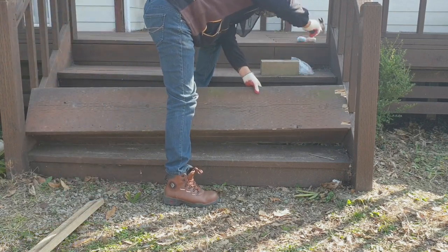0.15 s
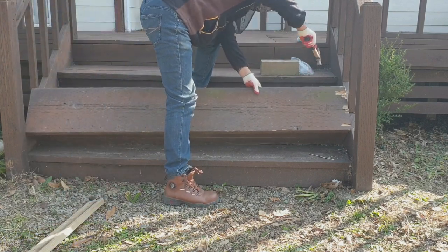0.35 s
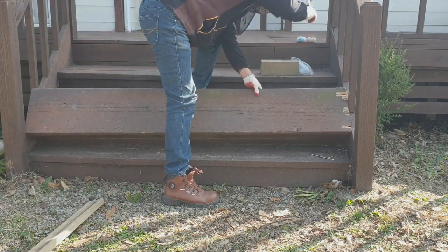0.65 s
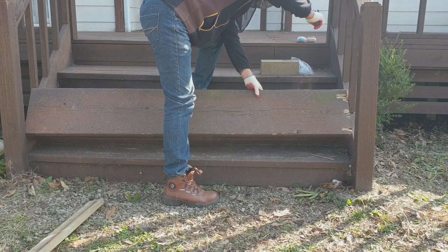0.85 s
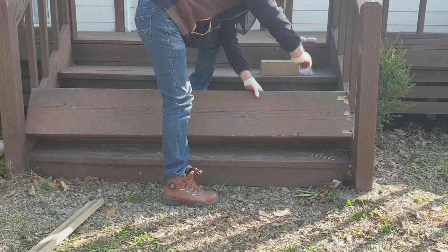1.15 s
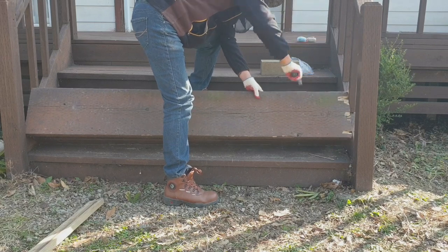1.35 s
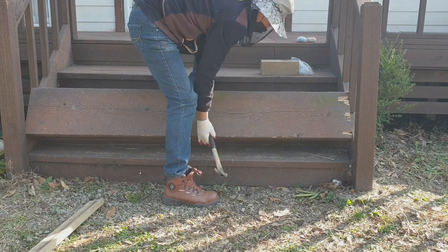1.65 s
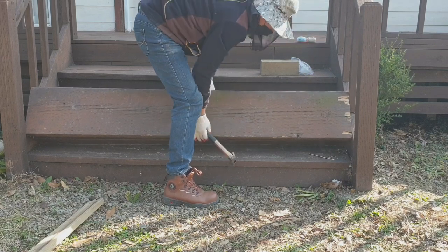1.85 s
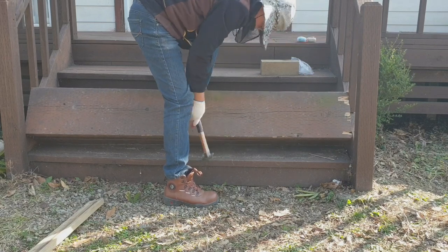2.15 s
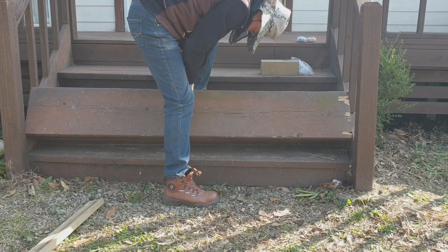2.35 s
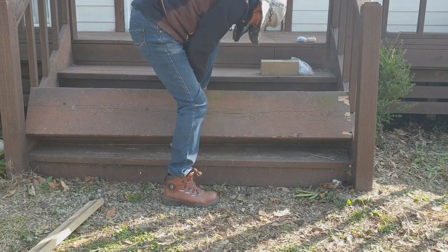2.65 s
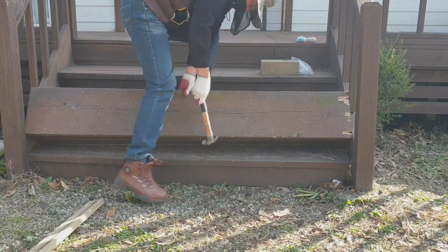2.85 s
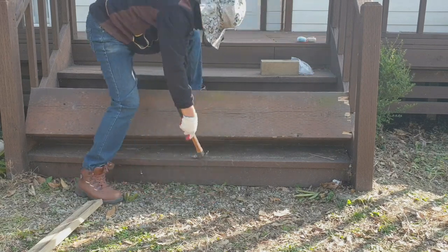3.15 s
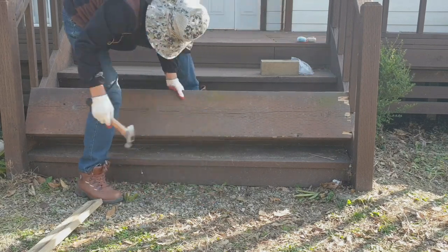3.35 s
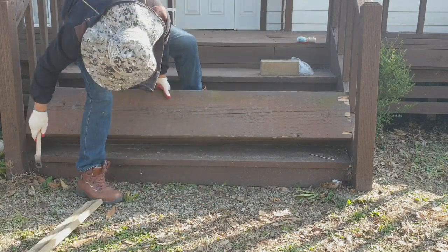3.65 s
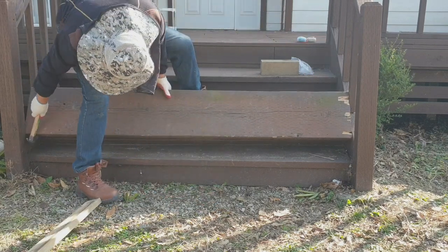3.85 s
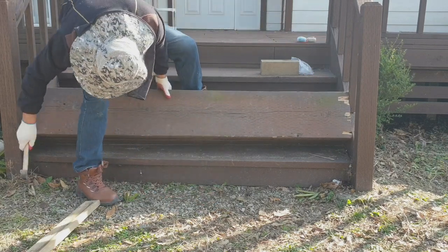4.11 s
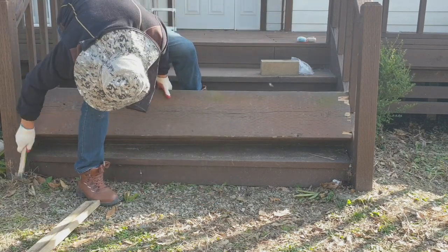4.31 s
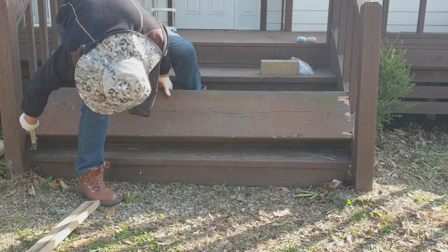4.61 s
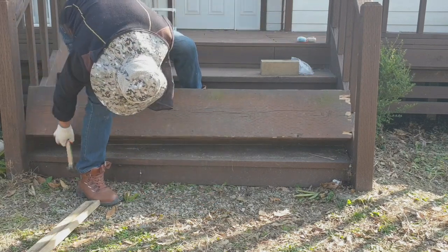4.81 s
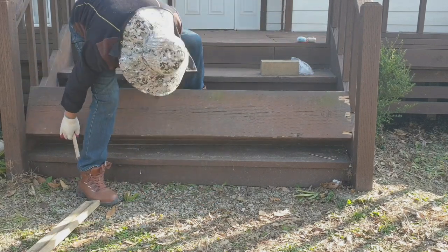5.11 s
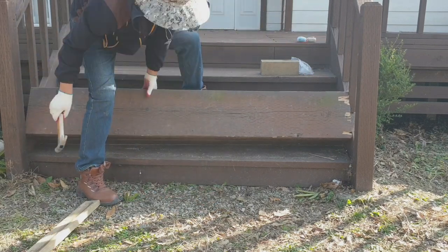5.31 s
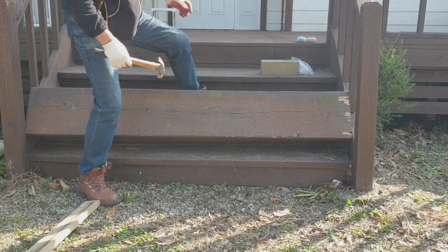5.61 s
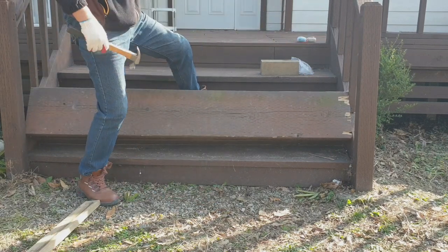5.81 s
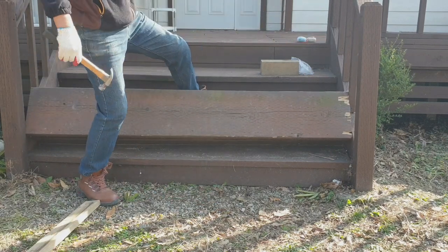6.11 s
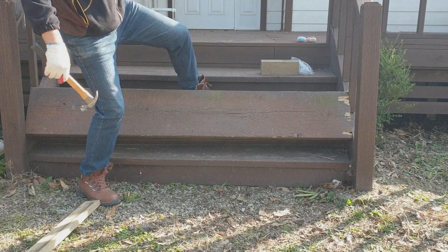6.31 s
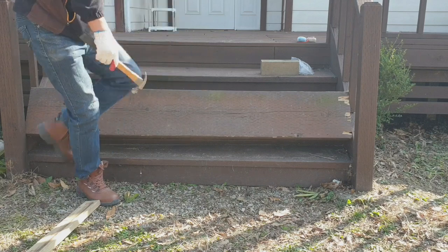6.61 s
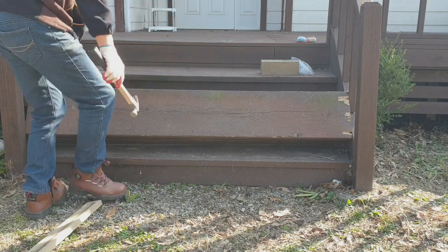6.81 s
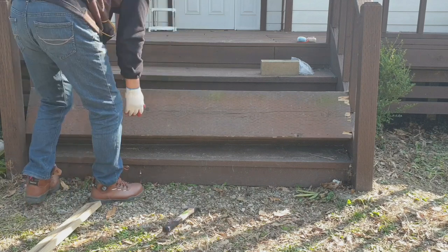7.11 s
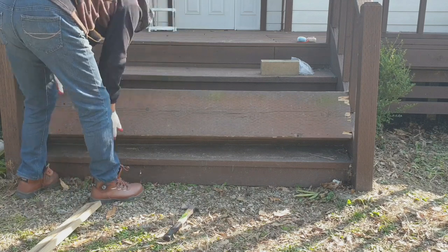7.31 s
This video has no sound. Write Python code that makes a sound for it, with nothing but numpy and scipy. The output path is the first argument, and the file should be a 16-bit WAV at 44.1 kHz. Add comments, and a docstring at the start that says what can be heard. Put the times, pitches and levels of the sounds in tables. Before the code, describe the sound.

Outdoors in a yard, a hammer strikes a loose wooden stair tread about four times a second, hard woody knocks with a slight rattle. The blows stop while boots shift with dull bumps and gritty scuffs, then a few scattered knocks come mostly from the left. Finally only steps on gravel and dry leaves remain. Close stereo microphone, soft wind rumble and faint hiss.

```python
"""Hammer knocks on a loose tread of an outdoor wooden stair: first at its right end, later mostly at its left.
A knock is filtered noise in four bands with a rebound, over sine modes of the stair and a short tail of the yard.
Between the blows boots bump boards and ground and stones click under them, made in the same way without rebound;
soles also press gravel and dry leaves in noisy snaps.
Low puffs of wind rumble on the stereo microphone over a faint hiss; both are filtered noise."""
import sys
import numpy as np
from scipy import signal
from scipy.fft import rfft, irfft
from scipy.io import wavfile
from scipy.ndimage import uniform_filter1d

SR = 44100
rng = np.random.default_rng(int(sys.argv[2]) if len(sys.argv) > 2 else 0)


def store_wav(level_fs):
    """Save 16-bit WAV to argv[1]."""
    pcm = np.round(np.clip(np.atleast_2d(level_fs), -1, 1) * 32767)
    wavfile.write(sys.argv[1], SR, pcm.T.astype(np.int16))


N = 328986  # samples in the scene
CONTACT_SIZE = 16384  # samples in one knock or bump with its tail


def hammer(ring_db=-3.0):
    """Steel on wood: each blow is a clatter with one rebound, over the ring of the boards."""
    # hammer blows: (t/s, side - left + right, swell time/s, rebound after/s, rebound level/dB, force/dB,
    #   brightness/dB per step, then f/Hz and level/dB of the low, middle and high pitch that the place drives)
    blows = [ (0.095, 0.34, 0.0066, 0.013, -9, -25.5, 0, 239, -20.5, 584, -23.5, 850, -10),
             (0.311, 0.96, 0.0045, 0.016, 5, -27, -0.3, 196, -12, 306, -25, 626, -29.5),
             (0.553, 0.57, 0.0071, .014, 4.5, -28.5, 1, 118, -19.5, 208, -20, 608, -22.5),
             (0.795, .6, .007, 0.014, 0.5, -24, -1, 208, -16, 277.6, -8.5, 800, -27.5),
             (1.044, 0.58, .0078, .015, -8.5, -22.5, -0.5, 197.9, -13.5, 269.5, -12.5, 830, -14),
             (1.259, 0.97, .004, .01, -11, -27.5, 1.5, 210.1, -14.5, 313.4, -15.5, 1010, -22),
             (1.452, 0.48, 0.006, 0.016, -2, -37, -4, 192.4, -15.5, 285.5, -23.5, 430, -44),
             (3.002, -0.87, .0035, 0.011, -20, -35, -3.5, 134, -19.5, 198, -18, 466, -16.5),
             (3.812, -.75, .007, .016, -3.5, -28, -5, 190.5, -9.5, 322.5, -14, 470, -21.5),
             (4.263, .7, 0.0046, .02, -12, -24.5, -3.5, 171.2, -23, 344.5, -12, 1302, -20),
             (4.447, -0.83, .0066, 0.02, -3.5, -24, -3.5, 222.2, -11, 286.7, -10.5, 643, -14),
             (4.635, -.8, .0059, 0.013, -6, -27.3, -2.2, 246.9, -10, 278.4, -7.5, 530, -29.5)]
    # steel on wood in the bands thud, knock, crack, tick: (level at force 0/dB, steps of brightness)
    steel = [(1, -0.8), (0.15, -1.1), (0.69, 0.39), (-2, 1.5)]
    tail_db, tail_swell_s = 5.5, 0.009  # the yard's answer to a blow of this swell time without rebound

    out = np.zeros((2, N))
    left_end, right_end = grain_of_wood(-1), grain_of_wood(1)
    for s, side, time, rebound, rebound_db, force_db, bright_db, *driven in blows:
        levels = [force_db + db + steps * bright_db for db, steps in steel]
        bounce = amp(rebound_db)
        # longer contacts and stronger rebounds feed the yard more
        fed = time / tail_swell_s * (1 + 0.35 * bounce ** 2)
        wet_db = tail_db + 10 * np.log10(fed)
        colour = right_end if side > 0 else left_end
        knock = clatter(colour, side, time, levels, rebound, bounce, wet_db)
        ring = boards(side, time, zip(driven[::2], driven[1::2]))
        add(out, s, knock + amp(ring_db) * ring)
    return out


def clatter(colour, side, time, levels, rebound=0, bounce=0, wet_db=0,
            rattle_db=2.5, rattle_s=0.0013, echo_db=3.0, echo_s=0.009):
    """The crowd of short modes that one contact wakes, band by band as noise, and its tail in the yard."""
    # dense modes and yard tail in the bands thud, knock, crack, tick: (low f/Hz, high f/Hz, delay/s,
    #   swell time factor, rebound factor, tail level/dB, tail t60/s, left-right likeness)
    bands = [(106, 340, 0.00047, 1.2, 0.98, -11.5, 0.23, 0.98),
             (403.3, 1000, 0.0026, 1., 0.14, -10.5, 0.19, 0.82),
             (1106, 5450, 0.00037, .8, .6, -15.5, 0.21, 0.47),
             (4000, 13000, 0.00027, 0.52, 1., -16.5, 0.17, 0.42)]

    t, hz = np.arange(CONTACT_SIZE) / SR, freqs(CONTACT_SIZE)
    rattle = amp(rattle_db * wobble(CONTACT_SIZE, rattle_s * SR))  # the direct sound chatters
    echoes = amp(wet_db + echo_db * wobble(CONTACT_SIZE, echo_s * SR))  # rails and wall answer in clumps
    # a contact with little tick also has a duller crack
    dull = np.clip(amp(0.52 * (levels[3] - levels[2] + 6.0)), 0.55, 1)
    out = np.zeros((2, CONTACT_SIZE))
    for db, top, row in zip(levels, [1, 1, dull, 1], bands):
        lo, hi, delay, slow, share, tail_db, t60, likeness = row
        low_cut = 1 + (lo / (hz + 1)) ** 12
        high_cut = 1 + (hz / (hi * top)) ** 12
        band = colour / np.sqrt(low_cut * high_cut)

        first = swell(t - delay, time * slow)
        second = bounce * share * swell(t - rebound, 0.71 * time * slow)  # the loose board slaps back once
        shape = np.hypot(first, second)
        direct = unit(pair(band, likeness, CONTACT_SIZE, side) * shape * rattle)

        build_up = 1 - np.exp(-(t / 0.0078) ** 2)
        tail = pair(band, likeness ** 4, CONTACT_SIZE) * amp(tail_db - 60 * t / t60) * build_up
        tail /= np.hypot(1, (t / 0.42) ** 3)  # the tail fades faster as it goes on
        out += amp(db) * (direct * np.sqrt(np.mean(shape ** 2)) + tail * echoes)
    return out


def boards(side, time, driven, falloff_db=80, free=0.99, lag_s=0.00015, hold=1.03):
    """Modes of the stair as sines: they swell with the contact and ring on, strongest near the driven pitches."""
    # modes of the stair: (f/Hz, t60/s)
    modes = [(120, 0.038), (144, 0.16), (175, 0.17), (199, 0.14), (218, 0.14), (239, 0.13), (279, 0.044),
             (305, 0.18), (329, 0.11), (359, 0.091), (428, 0.08), (472, .06), (530, 0.089), (595, 0.091),
             (618, 0.03), (815, .06), (850, .04), (1010, 0.061), (1300, .04)]

    # both channels start late, except the left one for a contact on the right
    lag = np.array([[0 if side > 0 else lag_s], [lag_s]])
    t = np.maximum(np.arange(CONTACT_SIZE) / SR - 0.3 * time - lag, 0)
    contact = swell(t, hold * time)
    hz = np.array(modes)[:, 0]
    weight = np.zeros(len(hz))
    for pitch, db in driven:
        near = amp(-falloff_db * abs(np.log2(hz / pitch)))  # falloff in dB per octave of distance
        weight += amp(db) * near / near.sum()
    out = np.zeros_like(t)
    for gain, (f, t60) in zip(weight, modes):
        if gain > weight.max() / 100:  # leave out modes that are barely driven
            ring = free * amp(-60 * t / t60) * (1 - np.exp(-(t / time) ** 2))
            out += gain * np.hypot(contact, ring) * np.sin(2 * np.pi * f * t)
    return out


def grain_of_wood(side, ripple_db=4.5, spacing_hz=80):
    """Colour of one end of the tread: broad resonances and a fine random ripple that grows towards the treble."""
    # colour of the knocks: (f/Hz, level/dB per Hz)
    wood = [(35, -45.5), (60, -4), (287, 2.5), (503, -10.5), (593, -9.5), (749, -18), (842, -13.5),
            (968, -20), (2000, -24), (2250, -27.5), (4220, -31.5), (5090, -34.5), (7570, -38), (14600, -41),
            (16000, -57.5)]
    # resonances within that colour: (f/Hz, width/Hz, level at the left end/dB, level at the right end/dB)
    resonances = [(587, 14, 1, 6.5), (920, 180, 3.5, 5.5), (1270, 120, 6, 0.5), (1500, 72, 4, 5.5),
                  (1850, 240, 5.5, -1.5), (2603, 210, 3.5, 6), (4158, 400, -6, 1.5), (6290, 340, 5.5, 6.5),
                  (7400, 990, 11.5, 11.5)]

    hz = freqs(CONTACT_SIZE)
    ripple = ripple_db * wobble(len(hz), spacing_hz / hz[1]) * hz / (hz + 900)
    peaks = np.zeros(len(hz))
    for f, width, left_db, right_db in resonances:
        peak_db = right_db if side > 0 else left_db
        peaks += peak_db / (1 + (2 * (hz - f) / width) ** 2)
    return amp(read(wood, hz) + ripple + peaks)


def boots(ring_db=6.5):
    """Boots bumping boards and ground, and stones clicking under them: contacts without rebound."""
    # boots bumping boards and ground, and stones clicking under them: (t/s, side - left + right,
    #   swell time/s, weight level/dB, knock level/dB, tick level/dB, board pitch f/Hz)
    bumps = [ (1.681, -0.078, 0.0029, -77.5, -69.5, -70.5, 198), (1.812, -1.3, .007, -48.5, -57, -81, 196),
             (2.043, -0.41, 0.0056, -47, -61.5, -99, 262), (2.323, 1, 0.0069, -40, -55.5, -79.5, 148.2),
             (2.395, -0.47, 0.0082, -39.5, -59.5, -75.5, 172.8),
             (2.539, -0.26, 0.008, -62.5, -74.5, -75, 176), (2.717, .1, 0.017, -48.5, -71.5, -83.5, 183),
             (2.869, -0.43, 0.0061, -23.5, -36.5, -51.5, 166.7),
             (3.106, -0.84, 0.0015, -47.5, -49, -49, 202), (3.177, -1.2, 0.0076, -47, -49.5, -49.5, 119),
             (3.329, -2.05, 0.0097, -57.5, -58, -89, 125), (3.394, -2.42, 0.0056, -64.5, -58, -81, 201.5),
             (3.894, -1.1, 0.0044, -51.5, -49, -74, 201), (4.864, -0.32, 0.0079, -56, -58.5, -54.5, 173),
             (4.948, -1.6, 0.0073, -37.5, -55, -72, 206), (4.98, -1.2, 0.0024, -42.5, -55.5, -97, 181),
             (5.128, -1.2, .0089, -44, -61, -67, 176.3), (5.652, 0.49, 0.0048, -55, -87.5, -92, 119.2),
             (6.091, 0.14, 0.0061, -58, -90, -95, 120), (6.379, -0.6, 0.0035, -70, -61.5, -84, 208),
             (6.454, 0.92, 0.0061, -60.5, -64.5, -95, 175), (6.576, -.25, 0.0091, -67, -65, -98, 195),
             (6.668, -1.1, .0043, -69, -68.5, -79.5, 143), (6.822, -1.9, 0.0034, -56.5, -48.5, -72, 147),
             (6.894, -1.5, 0.002, -67, -51, -58, 197), (7.07, -0.6, 0.0082, -48.5, -64, -67, 227),
             (7.152, -.75, .0085, -51, -55.5, -37.5, 124.4), (7.224, -0.71, 0.0054, -86, -78, -47.5, 205),
             (7.289, -1, 0.0068, -31.5, -60.5, -62, 132)]

    out = np.zeros((2, N))
    for s, side, time, weight_db, knock_db, tick_db, pitch in bumps:
        thud_db = weight_db - 4  # the weight drives the thud and the board
        crack_db = (knock_db + tick_db) / 2 - 1
        levels = [thud_db, knock_db, crack_db, tick_db]
        bump = clatter(grain_of_wood(side), side, time, levels, wet_db=5.5)
        ring = boards(side, time, [(pitch, weight_db)], free=0.48)
        add(out, s, bump + amp(ring_db) * ring)
    return out


def gravel(grains_per_s=800, spread_db=4.5, grain_s=0.0014, bed=0.89, scuff_db=-1.56, crackle_db=2.0,
           split_hz=3000, clump_db=1.5, clump_s=0.0081):
    """Stones and dry leaves give way under a sole in many tiny snaps: decaying grains on a noise bed."""
    # soles on gravel and dry leaves, cloth rubbing: (start t/s, length/s, scuff level/dB and
    #   crackle level/dB, both before the common trims scuff_db and crackle_db)
    scuffs = [ (1.473, 0.046, -56, -66.5), (1.626, 0.034, -82, -81), (1.762, 0.14, -75.5, -78.5),
              (2.2, 0.12, -92, -87), (2.333, 0.066, -64, -73.5), (2.494, 0.057, -66, -84),
              (2.705, .15, -62, -70.5), (2.954, 0.041, -51.5, -55.5), (3.014, 0.34, -53.5, -62.5),
              (3.133, 0.067, -56, -55.5), (3.32, .1, -86.5, -77.5), (3.465, 0.13, -80, -80),
              (3.57, .12, -68, -77), (3.868, .13, -61, -68), (4.092, 0.094, -71.5, -85),
              (4.859, 0.052, -60.5, -65), (5.094, 0.068, -61.5, -75), (5.184, 0.057, -70.5, -75),
              (5.671, .015, -98, -84.5), (5.75, 0.18, -84, -90.5), (6.134, .22, -83, -86.5),
              (6.33, 0.23, -76.5, -76), (6.56, 0.078, -70, -76), (6.664, 0.11, -72, -71),
              (6.77, 0.032, -56.5, -58), (6.799, 0.08, -54.5, -61.5), (6.86, 0.12, -63.5, -65),
              (7.064, 0.047, -51.5, -60.5), (7.135, .11, -60, -55), (7.295, 0.16, -64.5, -62)]
    # colour of the crunch: (f/Hz, level/dB per Hz)
    stones = [(180, -26.5), (300, -0.5), (614, -4), (725, -5.5), (1150, -5), (2070, -11.5), (4990, -23),
              (7320, -16.5), (9710, -23), (12700, -24), (15200, -28.5), (16000, -31.5)]

    hz = freqs(N)
    presses = np.array([pressure(s, length) for s, length, *_ in scuffs])
    power = amp(np.array(scuffs)[:, 2:].T) ** 2 @ presses ** 2

    strength = amp(spread_db * np.minimum(rng.exponential(1, N), 4))
    snaps = strength * (rng.random(N) < grains_per_s / SR)
    decaying = signal.lfilter([1], [1, -np.exp(-1 / (grain_s * SR))], snaps)
    grain = unit(bed + unit(decaying))

    low = 1 / (1 + (hz / split_hz) ** 4)  # scuff below the split, crackle above
    out = np.zeros((2, N))
    for band, db, press in zip([low, 1 - low], [scuff_db, crackle_db], np.sqrt(power)):
        clumps = clump_db * wobble(N, clump_s * SR)  # the stones slip in small groups
        noise = pair(band * amp(read(stones, hz)), 0.3, N, side=-1.3)
        out += press * amp(db + clumps) * grain * noise
    return out


def pressure(start, length, press_share=0.26, sag_db_per_s=36.5, release_db_per_s=291):
    """Envelope of one scuff: it builds for a share of its length, eases, then dies faster."""
    t = np.maximum(np.arange(N) / SR - start, 0)
    rise = np.minimum(t / (press_share * length), 1)
    release_db = np.clip(release_db_per_s * (t - length), 0, 100)
    return rise * amp(-sag_db_per_s * t - release_db)


def wind(level_db=0.0, lump_db=6.5, lump_s=0.042, breeze_db=-79.5, air_db=-81.5, drift_db=-0.2):
    """Low, lumpy puffs on the microphone over the faint, nearly steady hiss of the yard."""
    # puffs of wind: (peak t/s, half length/s, level/dB)
    gusts = [(0.224, 0.11, -61), (0.505, .1, -53), (0.701, 0.16, -49.5), (1.303, 0.31, -66.5),
             (1.828, .11, -60.5), (3.12, 0.26, -61.5), (3.747, .06, -72), (4.42, 0.11, -59.5),
             (4.803, .13, -47), (5.25, 0.26, -58.5), (5.563, 0.048, -55.5), (5.803, 0.046, -52.5),
             (5.931, 0.046, -53.5), (6.219, 0.16, -63), (6.681, 0.083, -74), (7.395, 0.27, -64.5)]
    # colour of the wind on the microphone: (f/Hz, level/dB per Hz)
    rumble = [(12, -43), (20, -8.5), (54, -0.5), (81, -2.5), (179, -25), (295, -41), (330, -51),
              (600, -66.5), (780, -97.5)]
    # colour of the yard's hiss: (f/Hz, level/dB per Hz)
    air = [(200, -7.5), (400, -11), (800, -14.5), (2000, -21), (5000, -23.5), (7200, -17), (10000, -25.5),
           (15000, -27)]

    t, hz = np.arange(N) / SR, freqs(N)
    puffs = amp(breeze_db) + sum(amp(db) * np.exp(-((t - s) / half) ** 2) for s, half, db in gusts)
    gust = puffs * amp(level_db + lump_db * np.tanh(wobble(N, lump_s * SR)))
    blowing = gust * pair(amp(read(rumble, hz)), 0.92, N) * amp([[-0.4], [0.4]])  # a little more on the right
    hiss = amp(air_db + drift_db * wobble(N, 0.3 * SR)) * pair(amp(read(air, hz)), 0.085, N)
    return blowing + hiss


def amp(db):
    """Decibels to gain."""
    return 10 ** (np.asarray(db) / 20)


def unit(x):
    """Scales to rms 1."""
    return x / np.sqrt(np.mean(x ** 2) + 1e-20)


def read(points, hz):
    """Reads a table along a log-frequency axis."""
    f, value = np.transpose(points)
    return np.interp(np.log(hz + 1), np.log(f + 1), value)


def freqs(size):
    """Frequencies in Hz of a spectrum's bins."""
    return np.fft.rfftfreq(size, 1 / SR)


def add(mix, s, sound):
    """Mixes a stereo sound in at time s."""
    part = mix[:, max(round(s * SR), 0):][:, :sound.shape[1]]
    part += sound[:, :part.shape[1]]


def pair(gain, likeness, size, side=0, port_lag_s=0.00013):
    """Stereo noise of rms 1 with a given spectrum, left-right likeness and lag between the microphone ports."""
    a, b = np.exp(2j * np.pi * rng.random((2, len(gain))))
    c = np.clip(likeness, 0, 1)
    left = a * np.exp(-2j * np.pi * freqs(size) * port_lag_s * side)  # late for a sound on the right
    right = c * a + np.sqrt(1 - c * c) * b
    return unit(irfft(np.array([left, right]) * gain, size))


def swell(t, time):
    """Rises to 1 in the given time and dies away."""
    u = np.maximum(t, 0) / max(time, 1e-4)
    return u * np.exp(1 - u)


def wobble(size, width):
    """Smoothed random curve of rms 1 that changes over about width samples."""
    width = max(round(width), 1)
    once = uniform_filter1d(rng.standard_normal(size), width)
    return unit(uniform_filter1d(once, width))


def scene(cut_hz=50):
    """Hammer, boots, gravel and wind; the knocks and bumps carry little deep bass."""
    high_pass = signal.butter(2, cut_hz, "highpass", fs=SR, output="sos")
    wood = signal.sosfilt(high_pass, hammer() + boots())
    return wood + gravel() + wind()


def record(dry, edge_hz=16200):
    """The stereo microphone: its right port is more sensitive over most of the range; then the band limit."""
    # balance of the two ports: (f/Hz, left-right level/dB)
    lean = [(60, -8.5), (200, -1.5), (400, -1.5), (700, -1.4), (1300, 0), (2400, -4.5), (4400, -0.5),
            (8100, -4), (15000, 3.5)]

    half_db = read(lean, freqs(N)) / 2
    heard = irfft(rfft(dry) * amp([half_db, -half_db]), N)
    low_pass = signal.firwin(511, edge_hz, window=("kaiser", 9), fs=SR)
    return signal.oaconvolve(heard, low_pass[None], "same")


dry = scene()
out = record(dry)
store_wav(out)
```